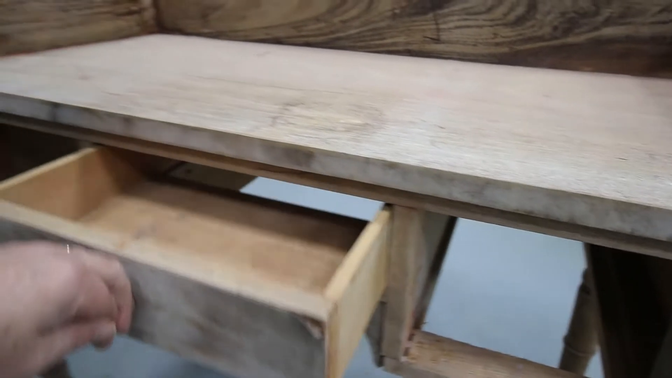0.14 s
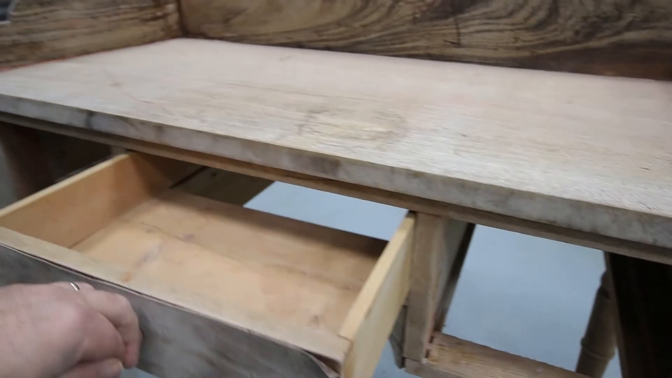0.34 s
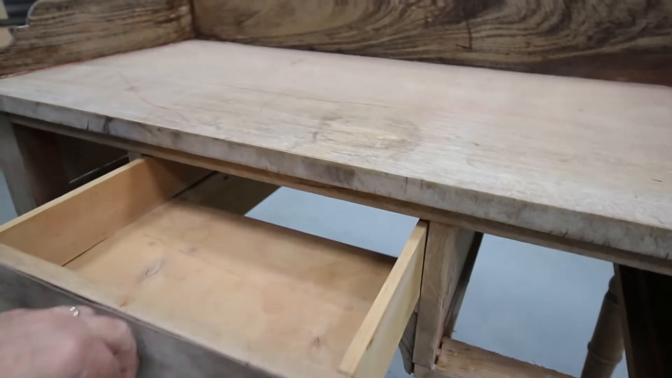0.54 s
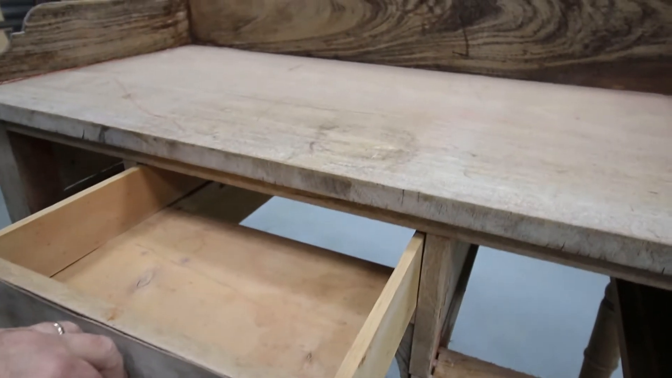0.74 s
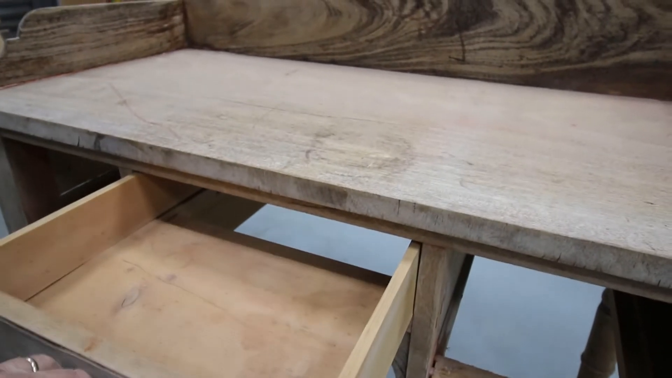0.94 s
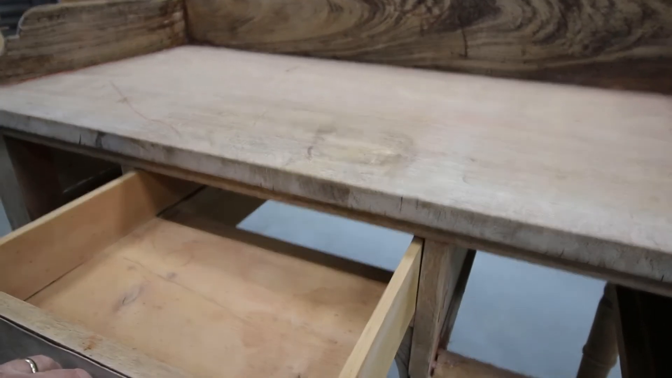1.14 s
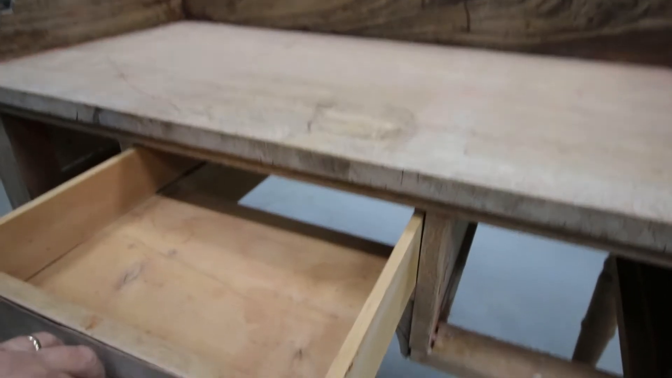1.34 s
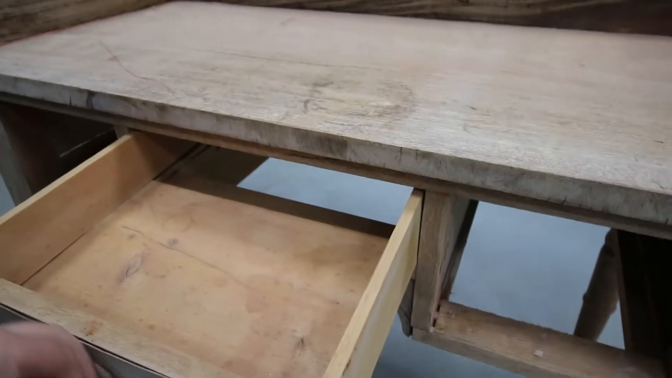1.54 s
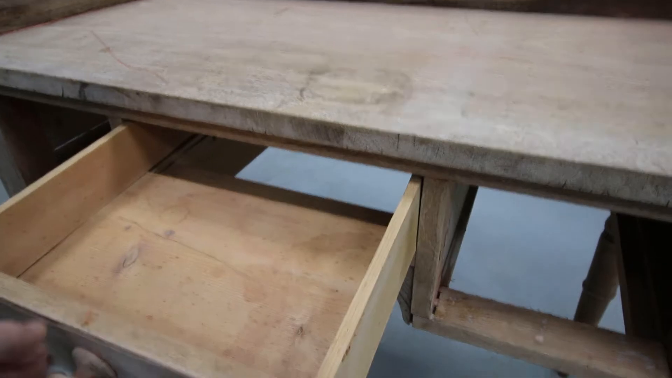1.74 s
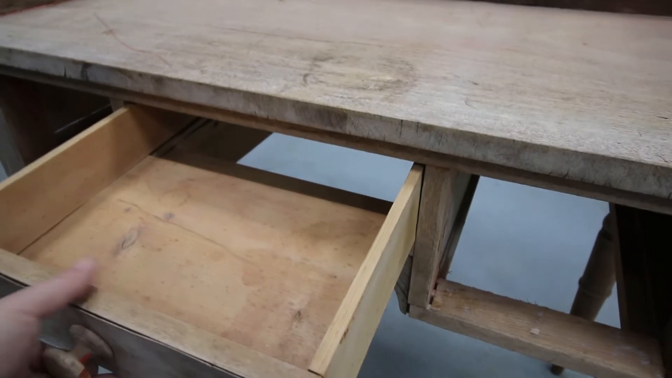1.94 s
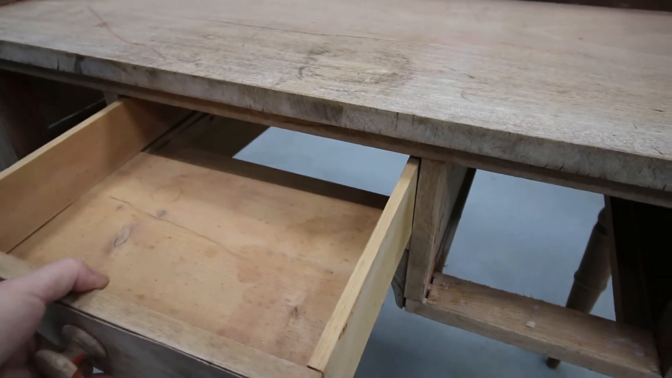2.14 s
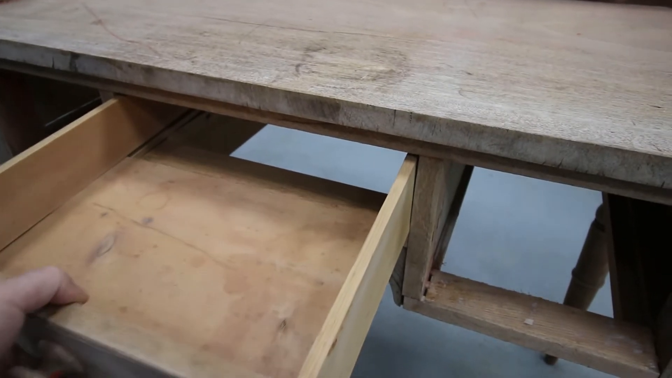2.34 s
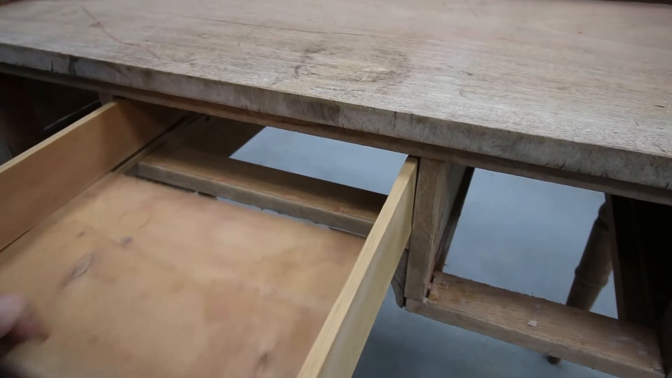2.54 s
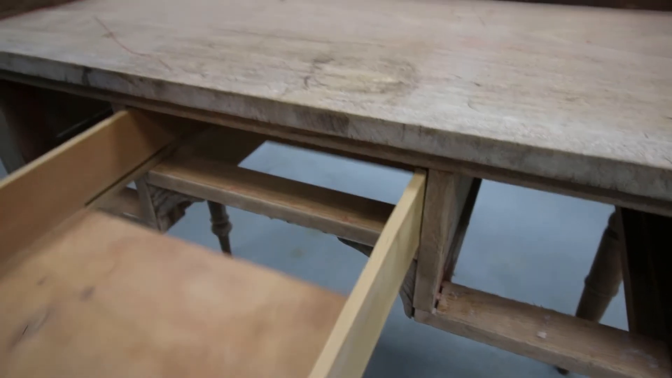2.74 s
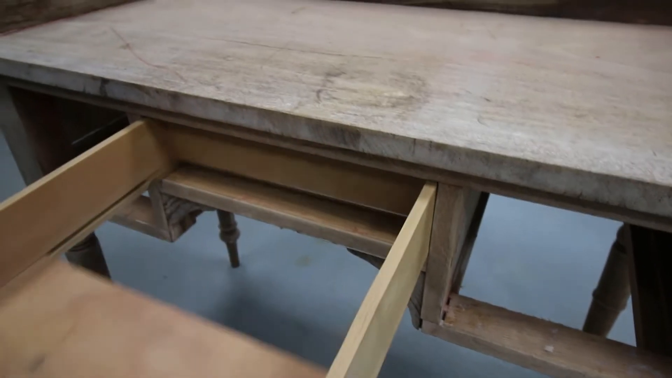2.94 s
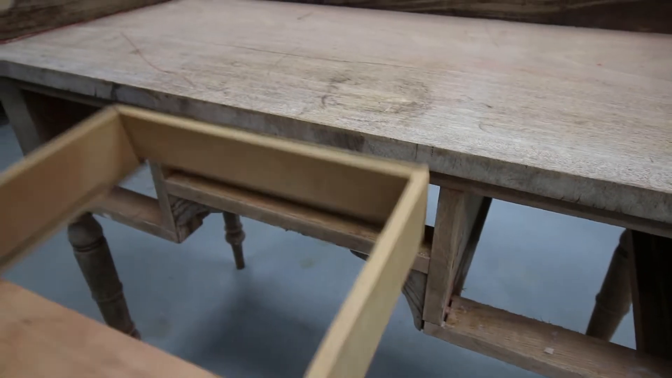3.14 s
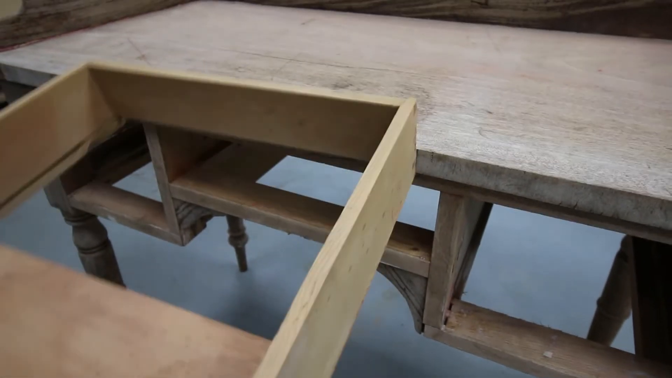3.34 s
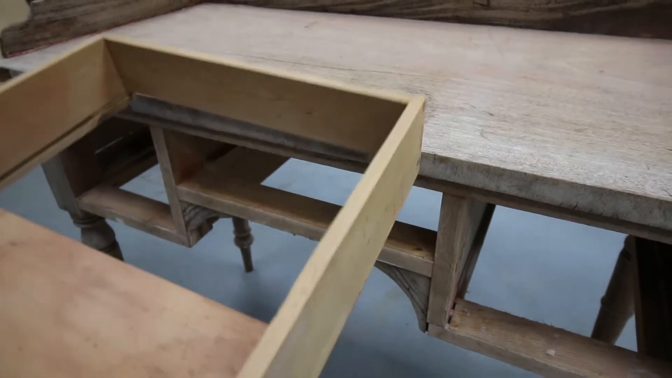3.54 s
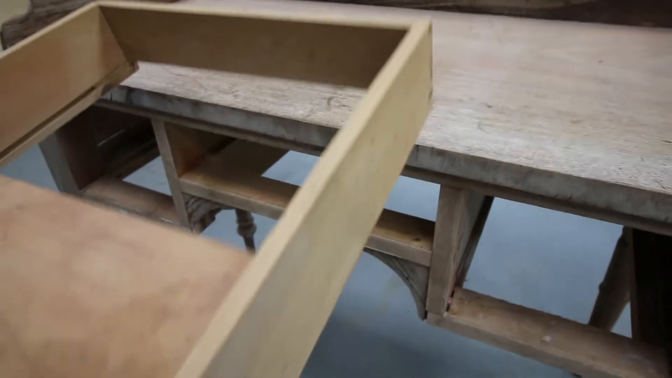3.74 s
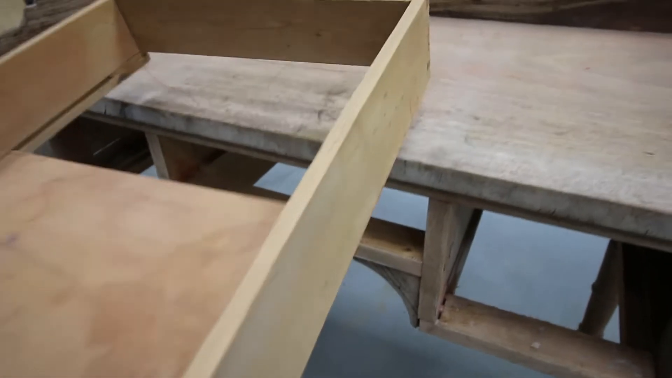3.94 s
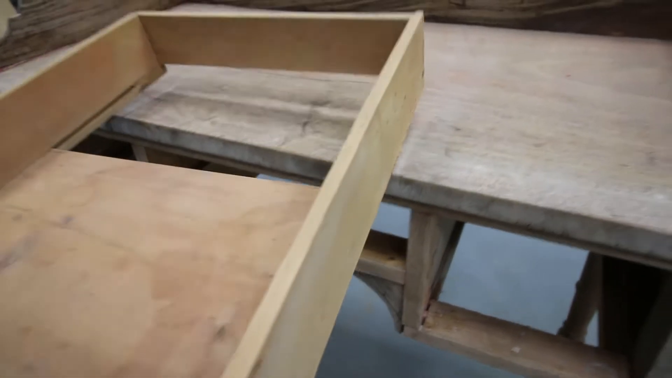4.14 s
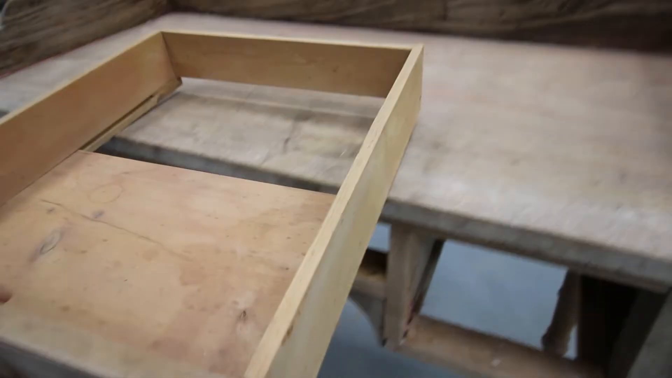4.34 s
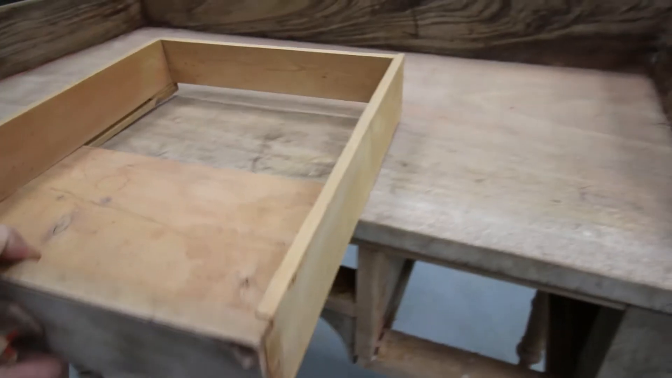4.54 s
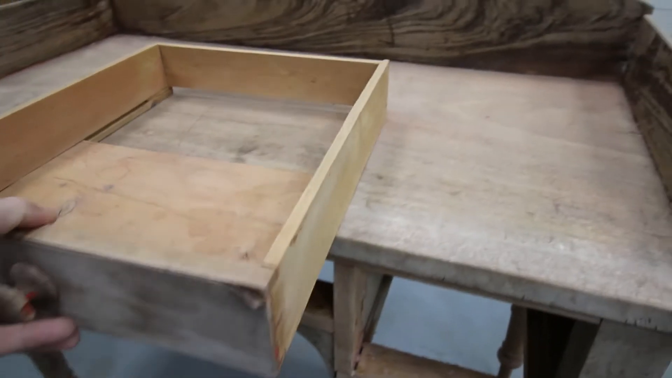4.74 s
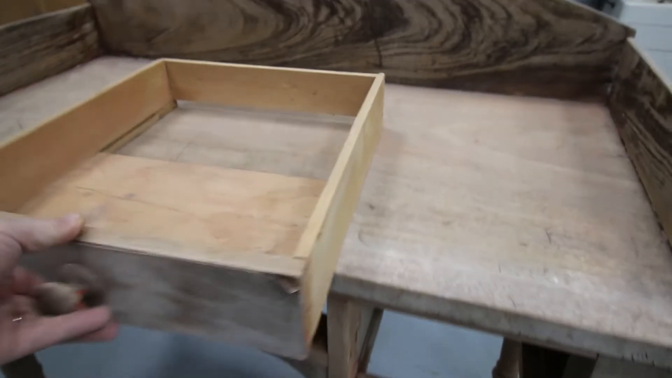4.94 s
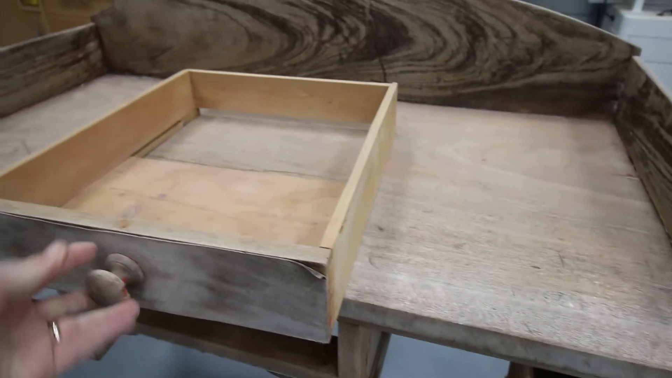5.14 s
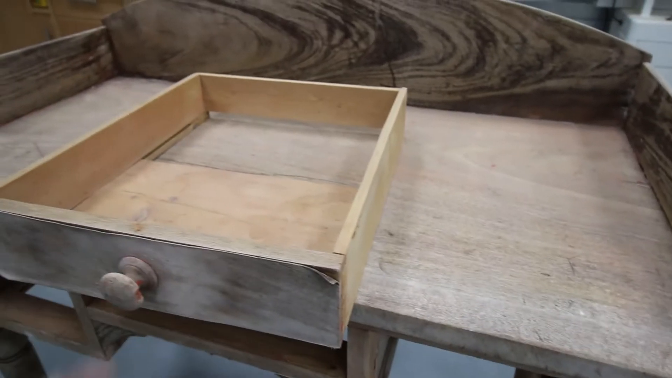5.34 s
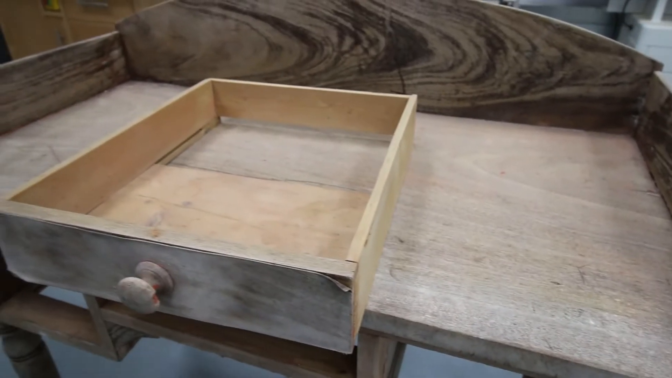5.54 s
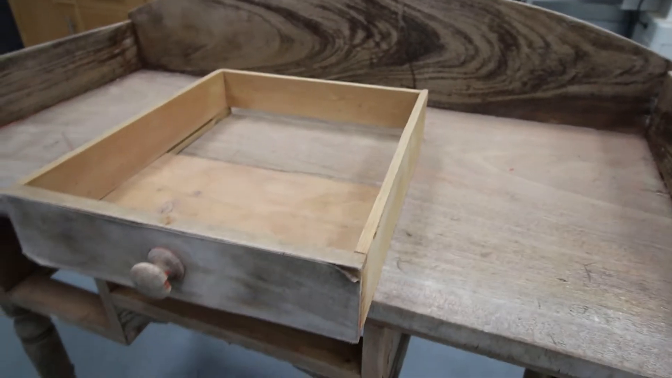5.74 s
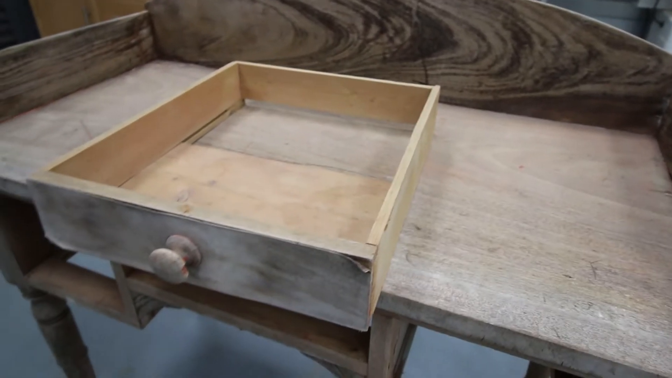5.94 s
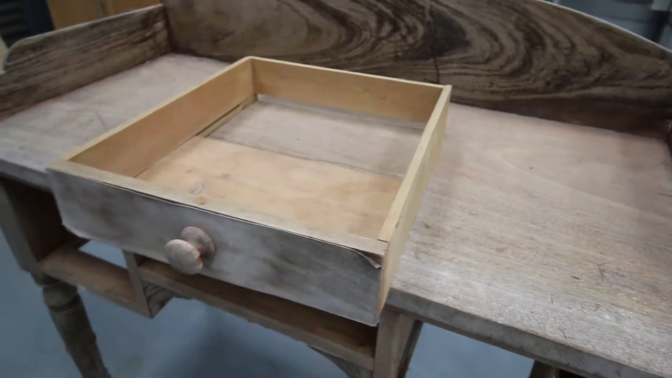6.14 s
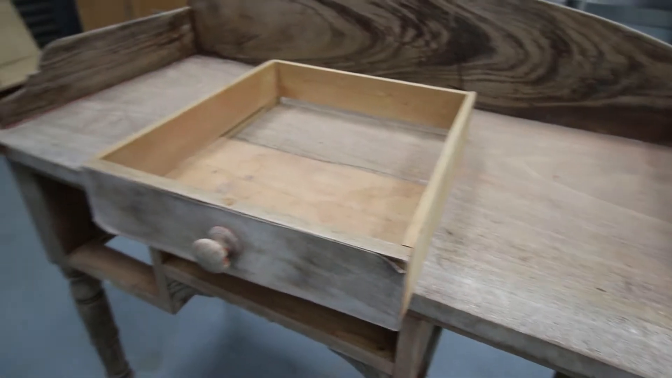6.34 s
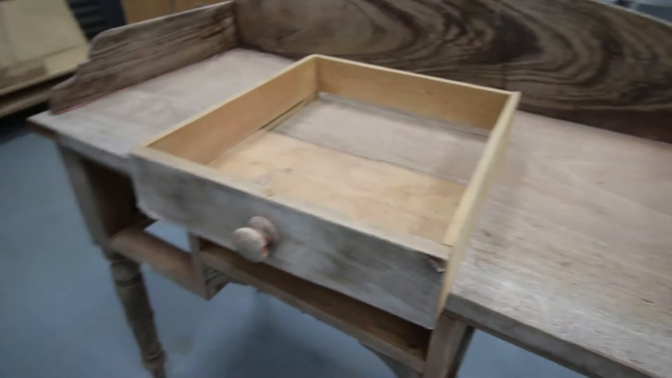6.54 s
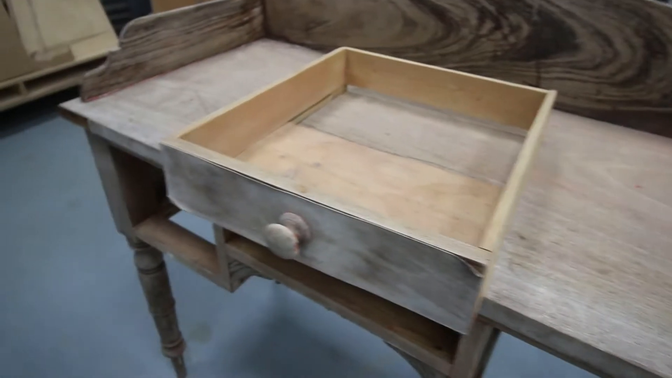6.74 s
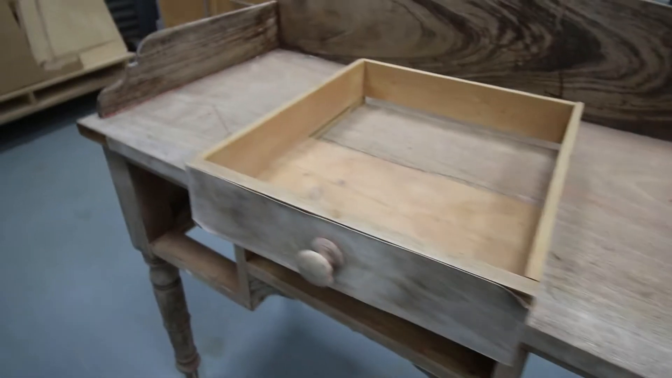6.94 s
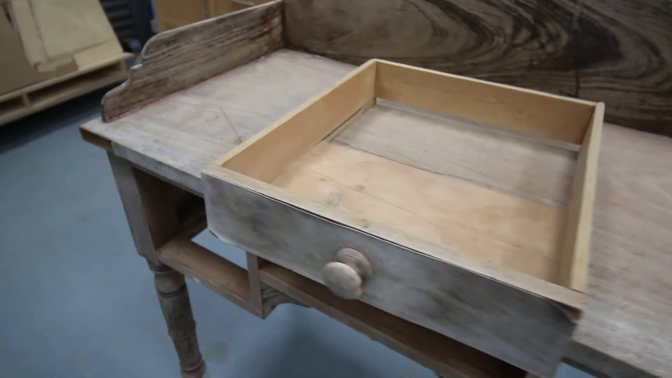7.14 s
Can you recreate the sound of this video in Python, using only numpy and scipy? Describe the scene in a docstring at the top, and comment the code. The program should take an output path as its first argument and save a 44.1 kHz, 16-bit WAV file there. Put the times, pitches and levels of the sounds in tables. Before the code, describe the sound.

Close in a large, bare workshop, an old wooden drawer scrapes from its desk, a runner giving a brief squeak. Quieter rubbing and a cluster of knocks follow, then it slides free with a sharp, hollow bang. After a lull it lands on the desk top with heavier clunks and is pushed along with low, grainy grating. Shoes and sleeves scuff softly at the end. Close stereo microphone, long hard echo, faint room noise and hum.

```python
"""An old wooden drawer is pulled out of a desk, lifted, knocked and pushed onto the desk top in a large bare
workshop. From the start wood rubs on wood, catching noise that rings resonators, and narrow noise bands
swell; a runner squeaks, a gliding sine, at 0.37 s. Knocks, sums of decaying modes, fall throughout, hardest
near 3.4 and 4.4 s; shoes and sleeves scuff, coloured noise, from 5.5 s. The hard room answers with a long
tail of decaying noise over steady room noise and a faint hum; two close microphone ports hear it all."""
import sys
import numpy as np
from scipy import signal
from scipy.fft import rfft, irfft, next_fast_len
from scipy.io import wavfile
from scipy.ndimage import uniform_filter1d

SR = 44100
rng = np.random.default_rng(int(sys.argv[2]) if len(sys.argv) > 2 else 0)


def wav_out(sig):
    """Save sig, one row per channel (or a flat mono array), as 16-bit PCM at SR to the path in sys.argv[1]."""
    wavfile.write(sys.argv[1], SR, np.round(np.clip(np.atleast_2d(sig).T, -1, 1) * 32767).astype(np.int16))


N = 320899

# modes of the four wooden parts: mode_hz, level_db, t60_s
FRAME_MODES = [(81, -7.5, 0.063), (115.2, -1, 0.12), (150, 1, 0.081)]
BOTTOM_MODES = [(200.6, -1, 0.21), (238, -2.5, 0.068)]
SIDE_MODES = [(250.7, 1.5, 0.092), (289, -0.5, 0.094), (320.7, -0.5, 0.12), (371.3, -2, 0.096),
              (423.7, -6.5, 0.12)]
FRONT_MODES = [(490, -13.5, 0.05), (581, -4, 0.045), (644, -3, 0.022), (763, -5.5, 0.03), (890, -7, 0.032),
               (987, -6, 0.021), (1170, -12.5, 0.0089), (1305, -9.5, 0.033), (1412, -11, 0.019),
               (1593, -12, 0.013)]
# spectrum of fine dusty hiss: freq_hz, density_db (relative, per Hz)
DUST_SPECTRUM = [(2060, -7.5), (3500, -7.5), (4760, -10), (5810, -13), (6710, -11), (12600, -20.5),
                 (15600, -27.5)]


def amp(db):
    """Level to amplitude: 20 dB is a factor of ten."""
    return 10 ** (np.asarray(db) / 20)


def evened(x):
    """Normalization: the signal is scaled to rms 1."""
    return x / np.sqrt(np.mean(x ** 2) + 1e-20)


def read(points, hz):
    """Logarithmic interpolation: a table over frequency is read on a log axis."""
    f, value = np.transpose(points)
    return np.interp(np.log(hz + 1), np.log(f + 1), value)


def curve(rows, axis):
    """Amplitude envelope: one level column of a list over time, at rest before and after."""
    rows = np.array(rows)
    s = [rows[0, 0] - .05, *rows[:, 0], rows[-1, 0] + .05]
    level_db = np.interp(np.arange(N) / SR, s, [-120, *rows[:, axis], -120])
    return amp(uniform_filter1d(level_db, size=200))


def strokes(rows, rise_db_per_s, fall_db_per_s):
    """Energy addition: gestures that each rise, hold and fall are summed in power."""
    t = np.arange(N) / SR
    power = 0
    for s, hold, db in rows:
        rise_db = np.minimum(rise_db_per_s * (t - s), 0)
        fall_db = np.maximum(fall_db_per_s * (t - s - hold), 0)
        power = power + amp(db + rise_db - fall_db) ** 2
    return np.sqrt(power)


def colour(x, points):
    """Linear filtering: a signal is shaped by a spectrum, then scaled to rms 1."""
    size = next_fast_len(x.shape[-1])
    gain = amp(read(points, np.fft.rfftfreq(size, 1 / SR)))
    return evened(irfft(rfft(x, size) * gain, size)[..., :x.shape[-1]])


def ring(x, hz, width):
    """Resonance: a one-pole complex resonator of peak gain near 1."""
    r = np.exp(-np.pi * width / SR)
    return 2 * signal.lfilter([1 - r], [1, -r * np.exp(2j * np.pi * hz / SR)], x).real


def glide(x, hz, width):
    """Heterodyning: a steep resonance follows the curve hz by shifting the signal down and back up."""
    turn = np.exp(2j * np.pi * np.cumsum(hz) / SR)
    r = np.exp(-np.pi * width / SR)
    return 2 * (turn * signal.lfilter([(1 - r) ** 2], [1, -2 * r, r * r], x / turn)).real


def grit(per_s, spread_db, lumps_db, lump_s):
    """Stick-slip: fibres catch and let go, uneven clicks over noise in clumps shared by both signals."""
    clicks = (rng.random(N) < per_s / SR) * amp(spread_db * np.minimum(rng.exponential(1, N), 2))
    size = int(lump_s * SR)
    lumps = uniform_filter1d(rng.standard_normal(N), size, mode="wrap")
    lumps = evened(uniform_filter1d(lumps, size, mode="wrap"))
    level = (0.31 * evened(clicks) + 1) * amp(lumps_db * lumps)
    return evened(level * rng.standard_normal((2, N)))


def ports(pair, same):
    """Partial coherence: two signals become left and right, offset in time and level."""
    # level difference of the ports: freq_hz, left_minus_right_db
    port_tilt = [(60, -1), (180, -0.5), (550, 0), (1650, -2), (4970, -1), (15000, 0)]
    lead_s = .000052  # the left port hears first
    size = next_fast_len(N)
    hz = np.fft.rfftfreq(size, 1 / SR)
    a, b = rfft(pair, size)
    c = np.clip(read(same, hz), -1, 1)
    # each port takes half of the offset
    half = amp(read(port_tilt, hz) / 2) * np.exp(1j * np.pi * hz * lead_s)
    return irfft([a * half, (c * a + np.sqrt(1 - c ** 2) * b) / half], size)[:, :N]


def air():
    """Stationary noise and narrow-band fluctuation: steady room noise with a wavering hum."""
    # spectrum of the room noise: freq_hz, density_db (relative, per Hz)
    air_spectrum = [(15, -19), (25, -15), (59, -6), (228, -3.5), (332, -6.5), (511, -8), (617, -13.5),
                    (1580, -12.5), (2130, -17), (7760, -25), (11300, -26.5), (12600, -50), (15600, -64)]
    # distant machinery: freq_hz, level_db, width_hz (of each of two resonators)
    hum_tones = [(56.8, -77, 3), (122.3, -83, 2.4)]
    air_db = -72.5
    noise = rng.standard_normal((2, N))
    hum = 0
    for hz, db, width in hum_tones:
        tone = evened(ring(ring(noise, hz, width), hz, width))
        power = abs(uniform_filter1d(tone ** 2, size=4000))
        hum = hum + amp(db) * tone / np.sqrt(power + 0.11)  # level held steadier
    return amp(air_db) * colour(rng.standard_normal((2, N)), air_spectrum) + hum


def room(x):
    """Reverberation: a few wall echoes and a dense tail that builds up and dies band by band."""
    # decay of the tail, apart from the far return: freq_hz, t60_s
    room_decay = [(100, 0.34), (250, 0.78), (700, 0.76), (1800, 1.2), (4000, 0.98), (8000, 0.67),
                  (13000, 1.34)]
    # first echoes, against the tail's total energy: delay_s, level_db
    wall_echoes = [(.006, -12), (.011, -13), (.019, -15), (.031, -16), (.047, -17)]
    far_s, far_spread_s, far_db = .16, .1, 4.  # the far end returns a broad swell over the tail
    hz, t, z = signal.stft(rng.standard_normal((2, 3 * SR // 2)), SR, nperseg=256)
    far = amp(far_db * np.exp(-((t - far_s) / far_spread_s) ** 4))
    decay = amp(-60 * t / read(room_decay, hz)[:, None])
    tail = signal.istft(z * far * decay, SR, nperseg=256)[1]
    build_up_s = 0.0021
    tail *= 1 - np.exp(-(np.arange(tail.shape[1]) / SR / build_up_s) ** 2)
    tail /= np.linalg.norm(tail[0])
    for s, db in wall_echoes:
        tail[:, round(s * SR)] += amp(db)
    return signal.fftconvolve(x[None], tail, axes=1)[:, :N]


def scuffs():
    """Friction noise: shoes rub softly on the concrete and sleeves rustle more brightly."""
    # spectra of the sole and its bright first brush: freq_hz, density_db (relative, per Hz)
    sole_spectrum = [(88, -27), (150, -2), (296, -0.5), (330, 2), (428, -8.5), (592, 2.5), (660, 0.5),
                     (1450, -3.5), (6000, -23.5), (7800, -37), (13200, -120)]
    brush_spectrum = [(700, -35), (1300, 1), (2200, -1), (3000, 1), (3800, -6.5), (6000, -26), (12000, -52)]
    # gestures of shoes, first brushes and sleeves: full_s, hold_s, level_db
    shoe_steps = [(5.514, 0.008, -65.5), (6.126, 0.094, -62.5), (6.68, .01, -81), (6.826, .01, -78),
                  (6.946, 0.069, -58)]
    sole_brushes = [(5.49, 0.044, -64), (6.108, 0.021, -66), (6.95, 0.06, -72)]
    sleeve_rustles = [(5.485, 0.023, -72), (5.5, 0.53, -66), (6.1, 0.02, -66.5), (6.68, 0.064, -70.5),
                      (6.826, 0.044, -71), (6.94, 0.014, -64.5)]
    rustle_low_db = -9  # the rustle's share of the low noise
    low = colour(grit(per_s=1300, spread_db=-16.0, lumps_db=0.0, lump_s=0.012), sole_spectrum)
    high = colour(grit(per_s=3000, spread_db=2.5, lumps_db=1.1, lump_s=.006), DUST_SPECTRUM)
    brush = colour(grit(per_s=1300, spread_db=5.5, lumps_db=1.5, lump_s=0.0047), brush_spectrum)
    brush = brush * strokes(sole_brushes, rise_db_per_s=1200, fall_db_per_s=99)
    rustle = strokes(sleeve_rustles, rise_db_per_s=400, fall_db_per_s=138)
    step = strokes(shoe_steps, rise_db_per_s=298, fall_db_per_s=34)
    return np.hypot(step, amp(rustle_low_db) * rustle) * low + rustle * high + brush


def squeak():
    """Stick-slip oscillation: a runner sticks and slips in a short pure note that rises a little."""
    full_s, hold_s, level_db = .366, 0.0043, -43.5
    centre_hz, rise_hz_per_s = 575, 300
    attack_s = 0.014  # over its last 12 dB
    t = np.arange(N) / SR
    level = strokes([(full_s, hold_s, level_db)], 12 / attack_s, fall_db_per_s=266)
    hz = centre_hz + rise_hz_per_s * np.clip(t - full_s, -.05, .05)
    return np.sqrt(2) * level * np.sin(2 * np.pi * np.cumsum(hz) / SR)  # root 2: the level is rms


def narrow_bands():
    """Band-pass noise: narrow gliding bands swell and sink; some prolong squeak and hard knock as echo."""
    # bands: start_s, loudest_s, end_s, level_db, first_hz, last_hz, width_hz (of each of two poles)
    # a row that ends before it starts is silent
    band_rows = [(0, 0.027, 0.075, -61, 1180, 1100, 120), (0, .12, .31, -65.5, 2930, 2820, 310),
                 (0, .2, .36, -72, 3860, 3950, 900), (0.153, 0.217, 0.26, -57, 700, 703, 98),
                 (1.97, 2.034, 2.07, -64.5, 343, 343, 51), (4.421, 4.55, 4.2, -50, 204, 201, 16),
                 (4.8, 4.81, 4.69, -38.5, 150, 161, 49), (.36, 0.47, 0.58, -56, 586, 592, 17),
                 (.67, 0.712, 0.84, -70, 598, 592, 9.5), (.72, 0.793, 0.81, -67.5, 193.5, 199, 11),
                 (0.916, 0.99, 1.09, -66, 364, 378, 31), (0.943, 1.01, 1.07, -68, 1284, 1277, 83),
                 (1.203, 1.26, 1.36, -66.5, 350, 366, 59), (2.286, 2.32, 2.5, -69, 2560, 2500, 280),
                 (2.535, 2.595, 2.66, -68, 3130, 2790, 70), (2.56, 2.622, 2.67, -66, 2350, 2000, 78),
                 (2.553, 2.62, 2.7, -69, 2740, 2360, 80), (2.63, 2.68, 3.3, -69.5, 1990, 1750, 65),
                 (2.661, 2.71, 3, -70, 2320, 2200, 100), (2.581, 2.64, 2.78, -67.5, 4850, 4470, 320),
                 (2.68, 2.717, 3.1, -60, 204, 200, 18), (2.8, 2.865, 3, -54, 208, 209, 18),
                 (2.901, 2.97, 3.1, -63, 1210, 1330, 140), (3.019, 3.097, 3.57, -71.5, 1230, 1270, 190),
                 (3.474, 3.535, 3.67, -62.5, 1350, 1300, 230), (3.411, 3.496, 3.81, -55.5, 557, 527, 270),
                 (3.42, 3.477, 3.71, -45.5, 295, 292, 150), (3.438, 3.505, 3.64, -45, 324.6, 328, 15),
                 (3.52, 3.61, 3.73, -51, 255.5, 261, 13), (3.422, 3.483, 3.66, -50.5, 430, 423, 30),
                 (4.723, 4.752, 4.83, -57, 1213, 1256, 54), (4.811, 5.01, 5.2, -56, 636, 652, 53),
                 (4.793, 4.812, 5.15, -57.5, 2280, 1980, 970), (4.861, 4.878, 4.88, -39, 190, 205, 37),
                 (4.951, 5.043, 5.05, -55, 1950, 2030, 440), (4.94, 4.96, 5.02, -43, 220, 202, 31),
                 (5.054, 5.07, 5.17, -45.5, 197, 210, 20), (5.089, 5.154, 5.17, -51.5, 2170, 2670, 730)]
    swell_db = -10.5  # a band at its ends, under its loudest
    steady, steady_s = 0.7, 0.033  # how far level fluctuations are evened out (share), averaging time
    steady_width_hz = 125  # only bands narrower than this are evened out
    out = np.zeros((2, N))
    for start, top, end, db, first_hz, last_hz, width in band_rows:
        t = np.arange(start, end, 1 / SR)
        noise = rng.standard_normal((2, SR))[:, :len(t)]
        band = glide(noise, np.linspace(first_hz, last_hz, len(t)), width)
        power = abs(uniform_filter1d(evened(band) ** 2, int(steady_s * SR)) + .05)
        band /= power ** (steady / 2 * (width < steady_width_hz))
        level_db = db + swell_db * np.interp(t, [start, top, end], [1, 0, 1]) ** 2
        band = evened(band) * amp(level_db) * signal.windows.tukey(len(t), .1)
        out[:, round(start * SR):][:, :len(t)] += band
    return out


def rubbing():
    """Forced vibration: blunt catches ring each part; separate brighter catches make scrape and hiss."""
    # one list a stretch of time: time_s, weight_db (of the ringing parts), scrape_db, hiss_db
    # most are wood on wood; from 3.8 to 4.3 s a faint low remainder of sound and a growing soft hiss
    stretches = [
        [(0.0, -45.5, -54, -71), (0.056, -48.5, -58.5, -64.5), (0.198, -55, -56, -66.5),
         (0.314, -49, -57.5, -64), (0.33, -49.5, -55.5, -66), (0.378, -46.5, -58, -71),
         (0.424, -57, -60.5, -71), (0.714, -67.5, -69.5, -97), (0.75, -63.5, -81, -95)],
        [(0.75, -74, -80, -98), (0.854, -69, -71, -86), (0.994, -63.5, -63, -71.5), (1.14, -76, -85, -95),
         (1.272, -59.5, -71.5, -89), (1.316, -77, -98, -99), (1.438, -68, -87, -99), (1.564, -60.5, -65.5, -70),
         (1.572, -61, -61, -69)],
        [(2.21, -75, -72, -77), (2.216, -67, -64.5, -71), (2.254, -43.5, -58.5, -65), (2.268, -47, -70, -72),
         (2.314, -53, -66, -59), (2.366, -48, -64, -64), (2.384, -51, -67, -67), (2.51, -64.5, -63, -63.5)],
        [(2.51, -63, -65, -66.5), (2.564, -56, -60, -60), (2.592, -52, -58, -66), (2.66, -59, -58, -67),
         (2.708, -51, -53.5, -59), (2.868, -57, -60.5, -70.5), (2.902, -64, -60, -63), (2.93, -60, -59, -57),
         (2.99, -55, -62, -67)],
        [(2.99, -55, -72, -68), (3.026, -68, -65, -67), (3.042, -44, -58.5, -61), (3.07, -54.5, -64, -67),
         (3.092, -45, -58.5, -65), (3.14, -54.5, -76, -63), (3.154, -63, -71, -71.5), (3.29, -83, -75, -72.5),
         (3.37, -83, -75, -84)],
        [(4.395, -35, -63, -83), (4.44, -51, -77, -86), (4.452, -35, -55, -72), (4.466, -44, -67, -84),
         (4.474, -35.5, -55, -74), (4.502, -52, -56, -77), (4.52, -39, -56.5, -71), (4.65, -43.5, -54.5, -67),
         (4.664, -45.5, -54, -68), (4.79, -51, -56.5, -65.5)],
        [(4.79, -50, -62, -78), (4.806, -45, -51, -65), (4.86, -41.5, -53.5, -63), (4.894, -49, -54.5, -65),
         (4.94, -47, -59.5, -65), (5.038, -42.5, -48.5, -62), (5.066, -39.5, -53, -61.5),
         (5.168, -47.5, -52, -60), (5.21, -49, -55.5, -64)],
        [(1.6, -67, -58, -62), (1.65, -55, -62, -71), (1.72, -60, -73, -71), (1.89, -64, -72.5, -73),
         (2.108, -67.5, -81, -68), (2.17, -68, -90, -86), (2.2, -73, -73, -93)],
        [(3.8, -58, -87, -99), (3.832, -61.5, -76, -99), (4.004, -70.5, -97, -99), (4.074, -72.5, -94, -85),
         (4.3, -74, -78, -77)],
        [(5.21, -56, -67, -76), (5.224, -48.5, -58.5, -76), (5.336, -58, -68, -78), (5.47, -67, -73, -76)],
    ]
    # share of the weight each stretch lays on the parts: frame_db, bottom_db, sides_db, front_db
    bearing = [(-11, -7.5, -4.5, -9.5), (-13, -11, -6.5, -11), (-10.5, -5.5, -2.5, -13),
               (-8.5, -5.5, -9.5, -8.5), (-7.5, -6.5, -7.5, -8), (-18.5, -5.5, -4, -11.5),
               (-8.5, -3.5, -6.5, -11.5), (-13, -12, -3.5, -10), (-19, -11, -3.5, -9),
               (-3.5, -6.5, -2.5, -8)]
    # spectrum of the scrape: freq_hz, density_db (relative, per Hz)
    grain_spectrum = [(650, -3), (1100, 4.5), (1530, -3.5), (2000, -3), (2320, -0.5), (4780, -10.5),
                      (5240, -13), (8000, -19), (10400, -32.5), (17600, -120)]
    # scrape resonances that wander as the contact moves: centre_hz, width_hz (of each pole), level_db
    grain_rings = [(1850, 210, 1), (2150, 85, -6), (2910, 79, -11), (1223, 74, -7)]
    wander, wander_s = .07, .08  # rms share of the centre, time between turns

    soft = signal.butter(2, 1800, fs=SR, output="sos")  # wood-on-wood catches are blunt
    drive = signal.sosfilt(soft, grit(per_s=220, spread_db=1.5, lumps_db=1.5, lump_s=0.0018))
    out = np.zeros((2, N))
    weights = np.array([curve(rows, axis=1) for rows in stretches])
    for k, part in enumerate([FRAME_MODES, BOTTOM_MODES, SIDE_MODES, FRONT_MODES]):
        rung = 0
        for m, (hz, db, t60) in enumerate(part):
            mode = ring(drive, hz, 2.08 / t60) * np.sqrt(t60)
            rung = rung + (-1) ** m * amp(db) * mode
        out += evened(rung) * (amp(bearing)[:, k] @ weights)

    scrape = colour(grit(per_s=700, spread_db=4.5, lumps_db=1.5, lump_s=0.004), grain_spectrum)
    turns = rng.standard_normal((len(grain_rings), int(N / SR / wander_s)))
    drifts = signal.resample(turns, N, axis=1)
    wandering = 0
    for (hz, width, db), drift in zip(grain_rings, drifts):
        wandering = wandering + amp(db) * glide(scrape, hz * (1 + wander * drift), width)
    hiss = colour(grit(per_s=3000, spread_db=2.5, lumps_db=1.6, lump_s=.006), DUST_SPECTRUM)
    out += evened(scrape + wandering) * sum(curve(rows, axis=2) for rows in stretches)
    return out + hiss * sum(curve(rows, axis=3) for rows in stretches)


def knocks():
    """Modal synthesis: blows excite decaying modes, clack and tick; returns near sound and room send."""
    # blows: start_s, front_db, frame_db, bottom_db, sides_db, tick_db, clack_db
    blows = [(0.318, -42.5, -68, -59, -41, -64, -42.5), (.943, -53.5, -80, -76, -62, -80, -72),
             (.995, -57, -68, -83, -69, -81, -70), (1.577, -43, -49, -54, -42, -62, -53),
             (1.584, -37, -38, -55, -38, -41.5, -55), (1.589, -31.5, -55, -43.5, -40, -58, -38.5),
             (1.609, -38.5, -42, -56, -45, -58, -52), (1.634, -39, -68, -49, -45, -73, -57),
             (2.206, -58, -75, -78, -59, -74, -69), (2.239, -41.5, -65, -65, -60, -59, -61),
             (2.256, -58, -58, -46, -50, -76, -73), (2.366, -41, -46, -72, -48, -68, -60),
             (2.683, -52, -63, -60, -74, -68, -62), (2.761, -41, -53, -75, -52, -66, -50),
             (2.934, -57, -73, -75, -63, -68, -60), (2.968, -51, -70, -73, -54, -72, -60),
             (3.035, -51, -45, -64, -54, -71, -59), (3.083, -45, -67, -54, -55, -71, -62),
             (3.091, -39.5, -45, -51, -64, -73, -49), (3.3983, -24.5, -42.5, -27, -28, -39, -38.5),
             (3.402, -32.5, -61, -49, -37, -59, -39.5), (3.565, -63, -72, -72, -64, -61, -66),
             (4.326, -31, -60, -60, -61, -48, -46), (4.329, -32, -37, -31, -27.5, -52, -48.5),
             (4.3765, -45, -41, -53, -41, -46, -33.5), (4.38, -25, -33, -41, -34.5, -59, -39.5),
             (4.397, -35, -53, -32, -34, -68, -46), (4.478, -47, -36.5, -34, -47, -66, -55),
             (4.806, -46, -38.5, -40, -39, -66, -49), (4.824, -44, -39.5, -50, -50, -70, -57),
             (4.879, -57, -61, -38, -36.5, -67, -60), (5.001, -42, -40, -51, -56, -70, -63),
             (5.033, -51, -60, -60, -44, -70, -49), (5.057, -45, -54, -37, -52, -65, -60),
             (5.085, -36, -39, -42, -43, -72, -48), (5.138, -43, -49, -43, -49, -70, -61),
             (5.159, -46, -60, -55, -55, -68, -57), (6.82, -58.5, -80, -85, -64, -82, -71)]
    # dense short upper modes, and first contact of the edges: freq_hz, density_db (relative, per Hz)
    clack_spectrum = [(500, -3), (1200, 2.5), (2400, -2), (4000, -12), (6000, -23), (9000, -49)]
    tick_spectrum = [(3000, 7), (5500, 5), (8000, -1.5), (11000, -5), (15500, -20)]
    touch_s, panel_swell_s = 0.0013, 0.0053  # the large panels take longer to answer than the front
    mode_spread = 0.025  # modes of sides and front vary randomly in pitch by blow (largest share)
    snap_db = -20  # the sharp front of each clack
    sent_clack_db, sent_tick_db = -3.5, -7  # share that reaches the walls
    blur_s, blur_db = .0025, 8  # seen from all round, the front's modes smear into one short thud

    out = np.zeros((2, N + SR))
    t = np.arange(SR // 4) / SR
    parts = [FRONT_MODES, FRAME_MODES, BOTTOM_MODES, SIDE_MODES]
    hz, db, t60 = np.vstack(parts).T[:, :, None]
    is_front = hz > FRONT_MODES[0][0] - 1
    is_varied = hz > SIDE_MODES[0][0] - 1
    blurred = np.where(is_front, amp(blur_db) * np.exp(-t / blur_s), 1)
    swell = -np.expm1(-t / np.where(is_front, touch_s, panel_swell_s))
    fade = amp(db - 60 * t / t60) * swell

    click = signal.unit_impulse(len(t), 100)
    even_clack, even_tick = colour(click, clack_spectrum), colour(click, tick_spectrum)
    snap = amp(snap_db) * np.roll(even_clack, shift=-70)
    snap = snap * np.minimum(t / .001, 1) * np.exp(-t / .005)
    clack_shape = np.exp(-t / 0.0063) * (1 - np.exp(-t / 0.0011))
    tick_shape = np.exp(-t / .0032) * (1 - np.exp(-t / .0003))

    draws = rng.standard_normal((len(blows), 3, len(t)))
    for (s, *parts_db, tick_db, clack_db), z in zip(blows, draws):
        sign = np.sign(z[0, :len(hz)])  # each mode starts with a random sign
        detuning = mode_spread * is_varied * np.tanh(z[0, -len(hz):, None])
        modes = fade * np.sin(2 * np.pi * hz * (1 + detuning) * t)
        share = sign * amp(np.repeat(parts_db, [len(p) for p in parts]))
        body, blur = share @ modes, share @ (modes * blurred)
        clack = amp(clack_db) * (colour(z[1], clack_spectrum) * clack_shape + snap)
        tick = amp(tick_db) * colour(z[2], tick_spectrum) * tick_shape
        # the many angles even out the colour of what is sent round the room
        sent = amp(sent_clack_db) * clack.std() * even_clack
        sent = sent + amp(sent_tick_db) * tick.std() * even_tick
        out[:, round(s * SR):][:, :len(t)] += [body + clack + tick, blur + sent]
    return out[:, :N]


def scene():
    """Superposition: near sounds, their tail in the room and the room noise add at the two ports."""
    # likeness of the two ports to a struck panel, a long rubbing edge and diffuse sound:
    # freq_hz, likeness (-1 to 1)
    struck_same = [(300, 1), (700, 0.96), (1000, 0.91), (2500, 0.44), (6000, 0.5), (15000, 0.43)]
    rubbed_same = [(60, 1), (180, 1.0), (550, 0.98), (1650, 0.94), (4970, 0.55), (15000, -0.32)]
    diffuse_same = [(60, 0.99), (180, 0.99), (550, 0.96), (1650, 0.64), (4970, 0.082), (15000, 0.096)]
    squeak_wet_db, struck_wet_db, rubbed_wet_db = -17, -2.5, -9.0  # the squeak also takes struck_wet_db
    scatter_s = 0.0019  # the desk scatters each blow on its way to the second port

    struck, sent = knocks() + squeak() * amp([[0], [squeak_wet_db]])
    rubbed = rubbing() + narrow_bands() + scuffs()
    scatter = rng.standard_normal(500) * np.exp(-np.arange(500) / SR / scatter_s)
    scattered = signal.oaconvolve(struck, scatter / np.linalg.norm(scatter))[:N]
    # deep bass is filtered from the room send
    sent = signal.sosfilt(signal.butter(2, 110, "high", fs=SR, output="sos"), sent)
    wet = room(amp(struck_wet_db) * sent + amp(rubbed_wet_db) * rubbed[0])
    near = ports(np.array([struck, scattered]), struck_same) + ports(rubbed, rubbed_same)
    return near + ports(wet + air(), diffuse_same)


def record(dry):
    """Band-pass response: bass roll-off of the small microphone, then the upper band limit."""
    edge_hz = 15750
    x = signal.sosfilt(signal.butter(4, 42, "high", fs=SR, output="sos"), dry)
    low_pass = signal.firwin(511, edge_hz, window=("kaiser", 9), fs=SR)
    return signal.oaconvolve(x, low_pass[None], "same")


dry = scene()
out = record(dry)
wav_out(out)
```